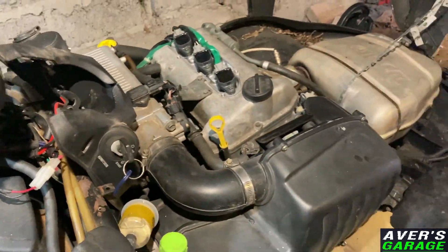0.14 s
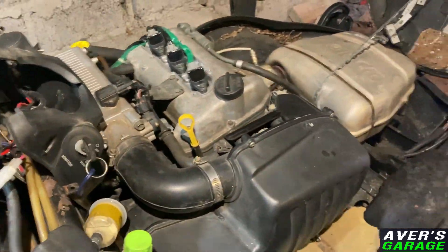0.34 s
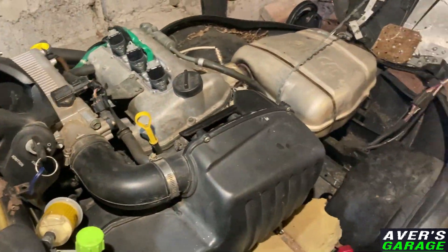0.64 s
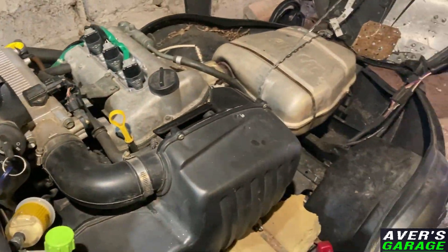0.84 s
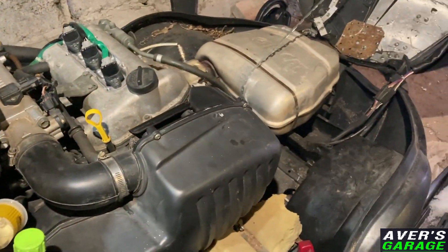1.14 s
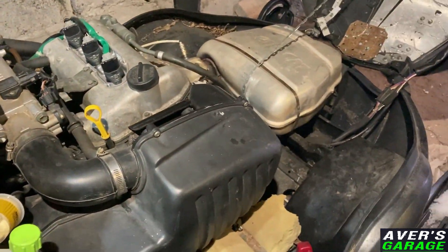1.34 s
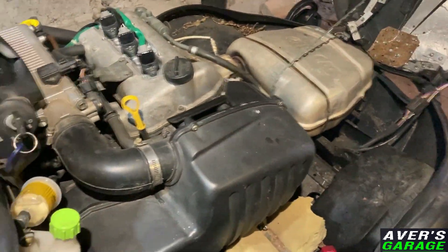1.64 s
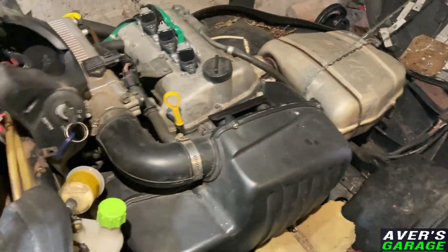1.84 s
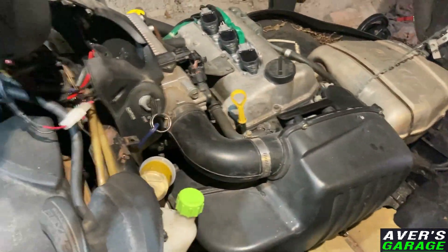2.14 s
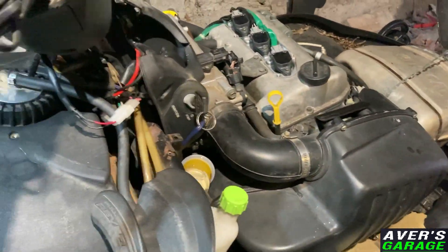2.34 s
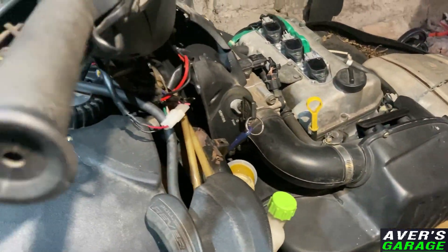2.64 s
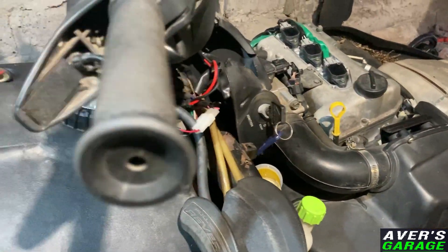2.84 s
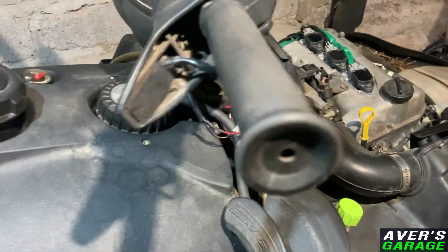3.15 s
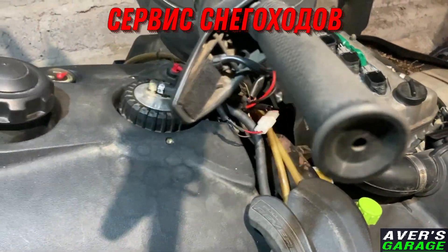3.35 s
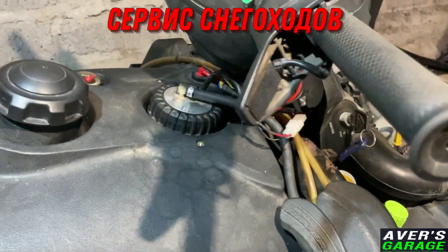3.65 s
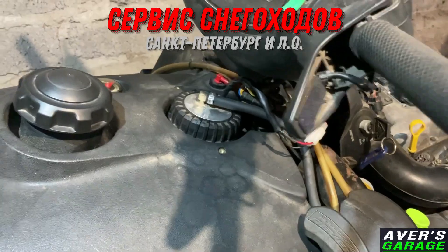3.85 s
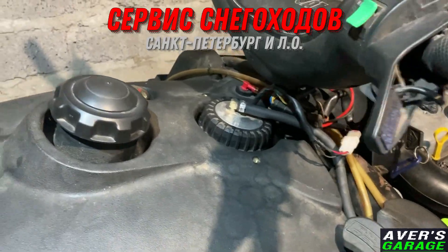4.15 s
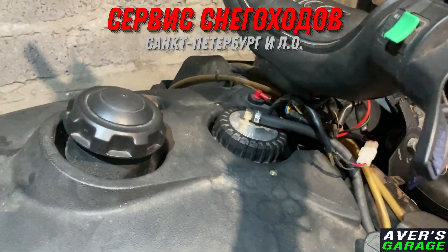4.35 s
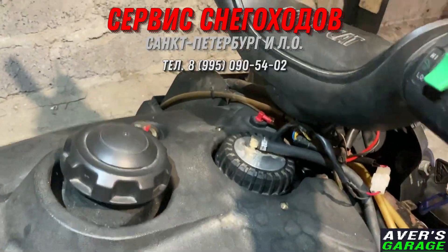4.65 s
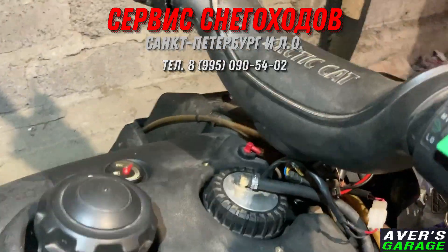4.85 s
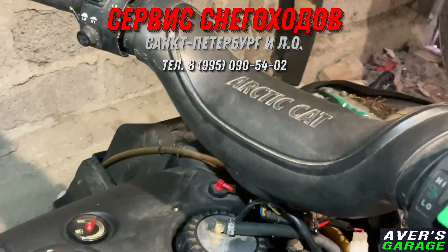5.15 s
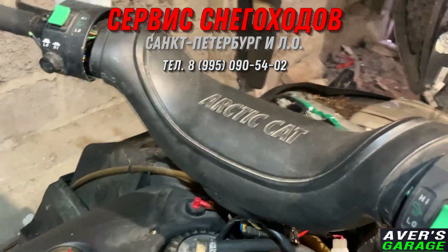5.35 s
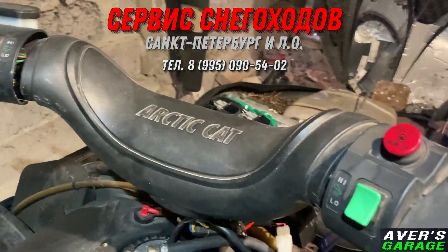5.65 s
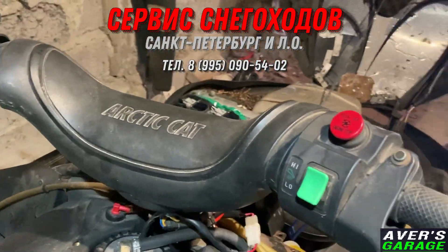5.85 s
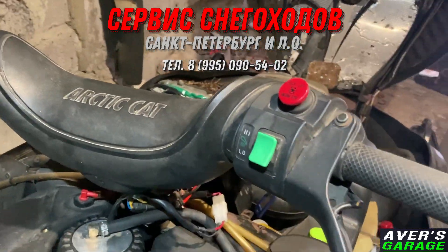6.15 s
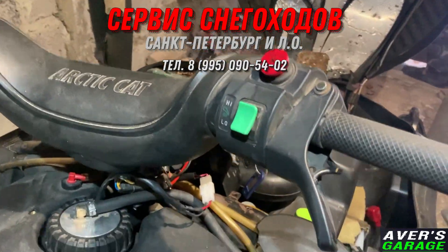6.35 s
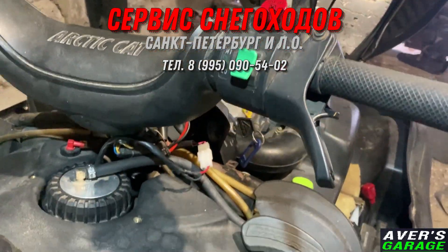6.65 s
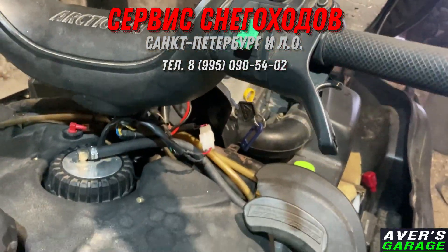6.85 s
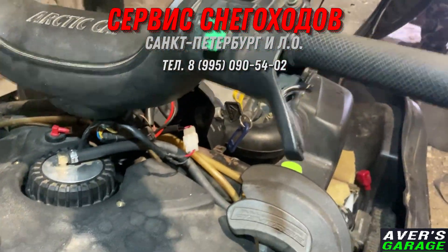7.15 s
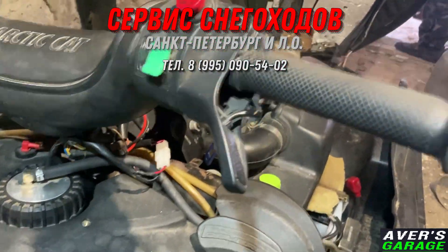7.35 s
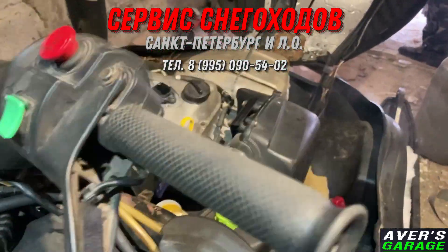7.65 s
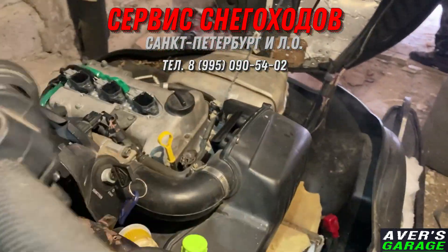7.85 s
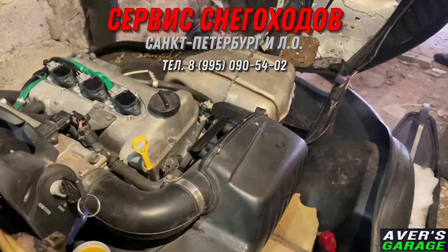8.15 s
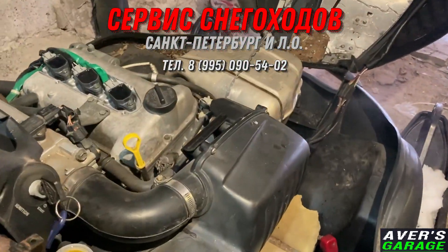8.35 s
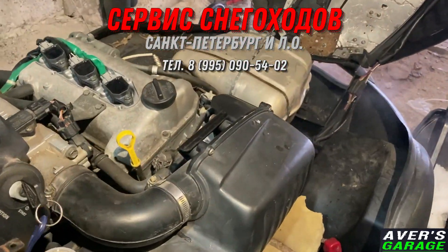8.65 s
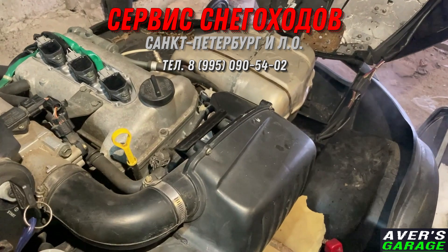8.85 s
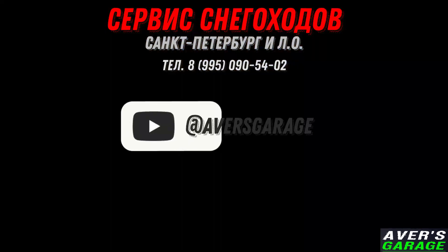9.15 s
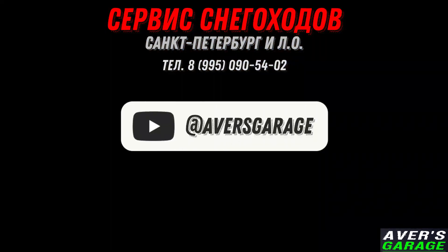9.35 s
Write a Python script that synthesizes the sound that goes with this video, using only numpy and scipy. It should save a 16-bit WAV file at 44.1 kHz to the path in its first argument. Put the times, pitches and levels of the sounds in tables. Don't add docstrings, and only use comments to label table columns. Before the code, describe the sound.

Close stereo sound of an idling four-stroke engine: a droning exhaust hum, dull low rumble, hollow metallic rattle, bright tapping valve gear and uneven loose clacks. The tone shifts as the listener moves around it, gaining rumble and fuller block ringing past halfway. The pace gently drops. A few dull footsteps and gritty scuffs come in the second half, and everything cuts to silence just before the end.

```python
import sys
import numpy as np
from scipy import signal
from scipy.fft import rfft, irfft, next_fast_len
from scipy.io import wavfile
from scipy.ndimage import uniform_filter1d, minimum_filter1d

SR = 44100
rng = np.random.default_rng(int(sys.argv[2]) if len(sys.argv) > 2 else 0)


def unload_audio(sound):
    columns = np.transpose(np.atleast_2d(sound))
    steps = np.round(np.clip(columns, -1, 1) * 32767)
    wavfile.write(sys.argv[1], SR, steps.astype(np.int16))


def rack_gain(trim_db):
    fader = np.asarray(trim_db, float)
    return 10 ** (fader / 20)


N = 419391
COARSE = 16


def evened(x):
    return x / np.sqrt(np.mean(x ** 2) + 1e-20)


def curves(rows):
    s, *columns = np.transpose(rows)
    return [np.interp(np.arange(N) / SR, s, c) for c in columns]


def at_place(way, values):
    return np.interp(way, range(4), values)


def coloured(x, points):
    size = next_fast_len(N)
    hz = np.fft.rfftfreq(size, 1 / SR)
    f, db = np.transpose(points)
    gain = rack_gain(np.interp(np.log(hz + 1), np.log(f), db, -120, -120))
    return irfft(rfft(x, size) * gain, size)[..., :N]


def resonate(x, hz, width):
    return signal.lfilter(*signal.iirpeak(hz, hz / width, SR), x)


def drift(rate_hz, count):
    t = np.arange(count) * COARSE / SR
    rates = np.geomspace(rate_hz / 8, rate_hz, num=7)
    return evened(sum(np.sin(2 * np.pi * (f * t + rng.random())) for f in rates))


def wander(rate_hz):
    return np.repeat(drift(rate_hz, N // COARSE + 1), COARSE)[:N]


def stereo(x, other, same, pan_db):
    same = np.clip(same, 0, 1)
    right = same * x + np.sqrt(1 - same ** 2) * other
    return np.array([x * rack_gain(pan_db / 2), right * rack_gain(-pan_db / 2)])


def exhaust(firings, way):
    # firing multiple, level in dB at each of the four places.
    main_orders = [(2, -46.5, -32.5, -28, -31.5), (3, -29, -25.5, -27.5, -30.5),
                   (4, -15.5, -17.5, -15, -14), (5, -28.5, -26.5, -41, -20.5),
                   (6, -43, -26.5, -21.5, -26.5)]
    # firing multiple, time in seconds of the lowest point,
    # seconds to leave it, change of level in dB at the lowest point.
    order_dips = [
        (3, 3.03, 1.5, -14.5),
        (5, 11, 0.59, -27.5),
        (6, 5.6, 0.75, -8),
    ]
    # multiple, level in dB at each of the four places.
    faint_orders = [(1, -44, -45.5, -71.0, -63), (7, -39, -39.5, -36.5, -28.5), (8, -50, -40, -42, -41.5),
                    (9, -58, -39.5, -38, -41.5), (10, -41.5, -38, -38, -38), (11, -49, -36.5, -31.5, -38),
                    (12, -47, -39, -44, -37), (13, -60, -60.5, -46.5, -34.5), (14, -47.5, -51, -42.5, -43),
                    (15, -58, -48.5, -41.5, -54), (16, -71.5, -68, -48, -51), (17, -62, -48.5, -60, -53.5),
                    (18, -44.5, -42.5, -40, -58), (19, -46, -57.0, -51, -57.5),
                    (20, -40.5, -49.5, -73.5, -51.5), (21, -70, -53, -71, -55),
                    (22, -48.5, -47.5, -74.5, -41.5), (23, -75, -39.5, -67, -55.5)]
    # multiple of the whole cycle, dB at each of the four places.
    uneven_lines = [(4, -50, -44.5, -48, -56), (5, -78, -52.5, -49, -51), (7, -72.5, -45, -47, -48.0),
                    (8, -66, -58, -62, -76.5), (10, -38, -34.5, -53, -55.5), (11, -38, -40, -61.5, -51.5),
                    (13, -43.5, -30, -38.5, -35), (14, -62.5, -39.5, -43, -41.5),
                    (16, -43.5, -40, -41.5, -53), (17, -47, -37, -33, -49), (19, -37, -45, -33, -37.5),
                    (20, -40.5, -36, -43.5, -31.5), (22, -57.5, -61, -42.5, -41), (23, -60, -45, -59, -64),
                    (28, -48, -57, -75, -60.5), (31, -40.5, -39.5, -56.5, -50.5),
                    (32, -60.5, -44.5, -65, -60), (34, -44.5, -39, -38, -47.5),
                    (35, -53, -49, -66.5, -48.5), (37, -79, -60, -57.5, -40), (38, -60, -50.5, -67, -49),
                    (40, -65.5, -53, -63.5, -43)]
    # time in seconds, change in dB.
    weak_firings = [(.299, -4), (.365, 0), (.891, -2.5), (1.156, -1.5), (2.1, -1.5), (2.371, -0.5),
                    (2.575, -2), (2.641, -0.5)]
    hum_pan = [-1.8, -3.0, -1.3, 0.5]
    port_turns, port_multiple = 0.2, 57
    sides = np.array([[0.5], [-0.5]])

    firings, way = firings[::COARSE], way[::COARSE]
    t = np.arange(len(way)) * COARSE / SR
    fifth_turns = 0.25 + 0.45 * (t > 6.95)
    hum = np.zeros((2, len(t)))
    for k, *db in main_orders:
        k = round(k)
        level = rack_gain(at_place(way, db) + 0.5 * drift(12.0, len(t)))
        for order, s, span, dip_db in order_dips:
            if round(order) == k:
                level = level * np.minimum(np.hypot((t - s) / span, rack_gain(dip_db)), 1)
        hum += level * np.cos(2 * np.pi * (k * firings - 0.4 + fifth_turns * (k == 5)))

    cycle_lines = [(3 * round(k), db) for k, *db in faint_orders]
    cycle_lines += [(round(k), db) for k, *db in uneven_lines]
    for k, db in cycle_lines:
        if k % 3:
            turns = k * (firings - 1.45) / 3
        else:
            turns = k * firings / 3 - 0.4
        apart = port_turns * (k / port_multiple) ** 2 * sides
        level = rack_gain(at_place(way, db) + 1.7 * drift(3.0, len(t)))
        jitter = 0.00008 * k * k / 2 * drift(5.0, len(t))
        hum += level * np.cos(2 * np.pi * (turns + apart + jitter))

    weak_db = sum(db * np.exp(-((t - s) / 0.018) ** 2) for s, db in weak_firings)
    pan_db = at_place(way, hum_pan) * sides
    return np.sqrt(2) * signal.resample_poly(hum * rack_gain(weak_db + pan_db), COARSE, 1, axis=1)[:, :N]


def blows(firings, loose_db):
    # place in firings, knock in dB, tick in dB, loose part in dB.
    cycle_blows = [
        (0.504, 6.5, 11.5, -0.5),
        (0.712, 5.5, -31, -8.5),
        (0.922, -8, -33.5, -21.5),
        (1.47, 2, 17, -7.5),
        (1.71, -1, -19, -10),
        (2.46, -13, 8.5, -6),
        (2.7, 6.5, 5.5, -13),
    ]
    spread_db, luck_limit = 2.6, 1.5
    slap_spread = 0.5
    knock, slack, tick = np.zeros((3, N))
    for place, knock_db, tick_db, slack_db in cycle_blows:
        at = np.flatnonzero(np.diff(np.floor((firings - place) / 3)))
        luck = np.clip(rng.standard_normal((4, len(at))), -luck_limit, luck_limit)
        at = np.clip(at + (2.0 * luck[2]).astype(int), 0, N - 1)
        knock[at] += rack_gain(knock_db + spread_db * luck[0])
        slack[at] += rack_gain(slack_db + loose_db[at] + slap_spread * spread_db * luck[3])
        tick[at] += rack_gain(tick_db + spread_db * (0.5 * luck[0] + 1.46 * luck[1]))
    return knock, slack, tick


def hard_slaps(knock, slack, loose_db):
    # time in seconds, level in dB, brightness in dB.
    first = [
        (.009, -14, -30),
        (0.03, -13, -22.5),
        (.097, -15.5, -32.5),
        (0.735, -19.5, -17),
        (.758, -16.5, -14.5),
    ]
    # time in seconds, level in dB, brightness in dB.
    early = [(0.076, -20, -23.5), (0.1411, -11, -21), (0.2074, -17.5, -15), (0.2755, -17, -5.5),
             (0.3628, -12, -34), (0.407, -13.5, -18.5), (0.473, -16.5, -14.5), (0.602, -14.5, -11),
             (0.668, -16, -13), (0.8013, -13, -9.5), (0.9354, -16.5, -10.5), (1.0006, -19.5, -16.5),
             (1.068, -13.5, -12.5), (1.1343, -16.5, -21.5), (1.2012, -24.5, -3.5), (1.267, -18.5, -9),
             (1.337, -18, -13), (1.4027, -22, -6.5), (1.471, -16, -13), (1.5372, -19.5, -6.5),
             (1.605, -24, -12.5), (1.6707, -24.5, -1), (1.7384, -20.5, -14), (1.8066, -20, -12),
             (1.9414, -18.5, -15), (2.0762, -20.5, -18), (2.143, -16, -15), (2.2114, -18.5, -21.5),
             (2.2794, -15, -23), (2.3468, -20, -9), (2.4828, -17.5, -10.5), (2.6842, -15, -18),
             (2.754, -21, -8.5), (2.8217, -16, -15.5), (2.9572, -16, -28), (3.0228, -16, -22.5),
             (3.0927, -14, -24.5), (3.1624, -14, -22.5), (3.228, -15, -16), (3.2962, -14.5, -26),
             (3.3625, -16.5, -14), (3.4356, -16, -22.5), (3.4993, -20, -19), (3.5716, -12, -22),
             (3.6346, -14, -15), (3.708, -23, -21.5), (3.7737, -16, -19), (3.8452, -15, -21.5),
             (3.912, -14, -15.5), (4.12, -18.5, -18), (4.1837, -14.5, -22.5), (4.2535, -12.5, -22),
             (4.3224, -12, -18.5), (4.463, -13.5, -24), (4.5302, -24.5, -18), (4.5988, -14.5, -21),
             (4.67, -19, -20.5), (4.7391, -17, -19.5),
             (5.2277, -14, -19), (5.2967, -19, -12.5), (5.4353, -15.5, -22.5), (5.5056, -15.5, -15.5),
            (5.578, -14, -17), (5.6448, -18, -19), (5.7146, -30, -3.5), (5.788, -13.5, -22.5),
            (5.857, -17.5, -12.5), (5.9306, -17.5, -15), (5.9998, -15, -14.5), (6.075, -16.5, -23.5),
            (6.1454, -11.5, -16), (6.1667, -15, -22.5), (6.218, -17, -19.5), (6.2898, -17, -15),
            (6.3597, -15.5, -13), (6.4102, -19, -17), (6.4323, -18, -13.5), (6.508, -11, -22.5),
            (6.5548, -21, -16), (6.579, -15, -18), (6.654, -16.5, -15), (6.7265, -26.5, -17.5),
            (6.7994, -13.5, -18.5), (6.8742, -13, -26), (6.9451, -14.5, -17.5), (7.0205, -16, -27.5),
            (7.094, -16.5, -15.5), (7.118, -17, -18), (7.169, -16.5, -18), (7.2446, -15.5, -17),
            (7.2686, -23, -8), (7.3188, -14, -20.5), (7.3924, -20, -14.5), (7.4688, -15, -15.5),
            (7.5435, -17, -29), (7.6168, -18.5, -17.5), (7.6937, -14.5, -20), (7.7686, -20, -15.5),
            (7.8436, -17.5, -23.5), (7.921, -15.5, -24), (7.9968, -16, -23), (8.0235, -22.5, -22),
            (8.0747, -17.5, -23), (8.1462, -17, -16.5), (8.3008, -20, -11.5), (8.3766, -22, -16),
            (8.4556, -21, -13.5), (8.533, -24, -13), (8.6121, -19.5, -11.5), (8.637, -22.5, -15.5),
            (8.6912, -24, -5.5), (8.7684, -19.5, -10), (8.846, -19, -10.5), (8.9232, -23.5, -10)]
    lift_db, bright_lift_db, block_knock_db = 21.5, 15.5, 4.5
    lead_s = 0.00099
    s, db, bright_db = np.transpose(first + early)
    at = ((s - lead_s) * SR).astype(int)
    db = db + lift_db + loose_db[at]
    hard = np.zeros((3, N))
    hard[:, at] = rack_gain(np.array([db, db + bright_db + bright_lift_db, block_knock_db + 0 * db]))
    free = minimum_filter1d(1. * (hard[0] == 0), size=441)
    return knock * free + hard[2], slack * free + hard[:2]


def burst(clicks, rise_s, quick_s, slow_s, slow_db, steady_db):
    t = np.arange(4000) / SR
    decay = np.exp(-t / quick_s) + rack_gain(slow_db) * np.exp(-t / slow_s)
    return signal.oaconvolve(clicks, (1 - np.exp(-t / rise_s)) * decay)[:N] + rack_gain(steady_db)


def rumble(knock, way):
    # frequency in Hz, level in dB per Hz.
    rumble_colour = [(18, -57.5), (30, -18.5), (113, -19.5), (173, -8), (297, -20.5), (362, -21),
                     (461, -21.5), (596, -52.5), (900, -23), (1170, -54.5), (1980, -120)]
    place_db = [-41, -36, -29, -29.5]
    level = rack_gain(at_place(way, place_db) + 3 * wander(1.6))
    puffs = burst(knock, 0.0092, 0.0029, 0.015, -30.0, 2.2) * rng.standard_normal((2, N))
    return level * stereo(*evened(coloured(puffs, rumble_colour)), 0.9, -2.6)


def block(knock, way):
    # frequency in Hz, level in dB per Hz.
    rattle_colour = [(290, -27), (500, -9), (563, 2.5), (690, -26.5), (776, -10), (1040, -5), (1830, -10.5),
                     (2320, -7.5), (6500, -14), (8450, -23), (14300, -120)]
    # frequency in Hz, width in Hz, level in dB at each of the four places.
    ring_modes = [(473, 45, 2.5, 6.5, 8, -1.5), (586, 52, -11, 7, 15.5, 2.5), (761, 50, 2, 4.5, 9.5, 4.5),
                  (1034, 51, -13, -2.5, 6, 2), (1190, 160, 1, 6, 9.5, -2.5),
                  (1252, 76, -7.5, -24.5, -13.5, -6.5), (1453, 51, -27.5, 4.5, 0.5, -11),
                  (1534, 26, -3.5, -7.5, -0.5, -1), (1650, 130, -8.5, -4.5, 0, -11),
                  (1906, 73, -5, -0.5, 4.5, -7.5), (2170, 190, -7, -5, 3.5, -2),
                  (2436, 49, -18.5, -33.5, 6, -2.5), (2600, 18, -10.5, -25, -27.5, -4.5),
                  (2600, 250, -19.5, -48, -17, -3.5), (3210, 12, -18, -27, -1, -24),
                  (3720, 21, -11, -12, -26, -28.5), (4010, 210, -7, -14, -7, -3),
                  (4740, 32, -12, -8.5, -3, -3)]
    # time in seconds, change in dB.
    ring_shading = [(0, -1.5), (1.2, 4.5), (2.8, 0), (3.7, -6.5), (4.3, 3.5), (5, 3.5), (6.8, 0), (7.7, -0.5),
                    (8.4, -2), (9, 6)]
    place_db = [-30, -29, -32.5, -29]
    strike_spread_db, ring_share = 3.0, 1.8
    ring_turns = 0.22
    noise = rng.standard_normal((3, N))
    rattle = burst(knock, 0.00025, 0.0031, 0.017, -3.0, -0.5) * noise
    at, rings = np.flatnonzero(knock), np.zeros((2, N))
    for k, (hz, width, *db) in enumerate(ring_modes):
        strike = np.zeros(N)
        strike[at] = rack_gain(strike_spread_db * rng.standard_normal(len(at)))
        level_db = at_place(way, db)
        if k == 2:
            level_db = level_db + curves(ring_shading)[0]
        ring = resonate(13.5 * strike * knock + rattle[2], hz, width) / np.sqrt(width)
        ring = rack_gain(level_db) * ring
        rings += [ring, np.roll(ring, round(ring_turns * SR / hz))]
    body = evened(evened(coloured(rattle[:2], rattle_colour)) + ring_share * evened(rings))
    return rack_gain(at_place(way, place_db)) * stereo(*body, 0, 0.21)


def loose_part(slack, way):
    # frequency in Hz, width in Hz, level in dB at each of the four places.
    slap_modes = [(1150, 204, -7.5, -3, 6, 2.5), (1422, 144, -8, -3.5, 6.5, -4.5),
                  (1725, 213, 0.5, -0.5, 3, -1.5), (2174, 200, -2.5, -8, 3, -5.5),
                  (3000, 1470, 0, -9.5, 5, -4.5)]
    click_gain = 7.0
    noise = stereo(*rng.standard_normal((2, N)), 0.13, 0.5)
    clacks = []
    for train in slack:
        clack = burst(train, 0.00015, 0.004, 0.018, -2.0, -61.5) * noise
        clacks.append(click_gain * train + clack)
    total = np.zeros((2, N))
    for k, (hz, width, *db) in enumerate(slap_modes):
        top = k == len(slap_modes) - 1
        ring = resonate(resonate(clacks[int(top)], hz, width), hz, 1.8 * width)
        total += rack_gain(at_place(way, db)) * ring / np.sqrt(width)
    return rack_gain(-32) * evened(total)


def valve_gear(tick, way):
    # frequency in Hz, level in dB per Hz.
    tick_colour = [(4200, -24), (5300, 2), (6300, 1), (7300, 7.5), (8300, 8), (9200, 16.5), (11000, 6),
                   (13500, 1.5), (15700, 4), (15950, -64.5)]
    place_db = [-32, -34, -36, -30]
    ticks = burst(tick, 0.00015, 0.00156, 0.012, 0, -0.5) * rng.standard_normal(N)
    return rack_gain(at_place(way, place_db)) * evened(coloured(ticks, tick_colour))


def steps():
    # start in seconds, length in seconds, thump in dB, scuff in dB, dullness from 0 to 1.
    footfalls = [
        (5.054, 0.13, -34, -14.5, 0.71),
        (5.102, 0.62, -32, -25.5, 0.94),
        (5.284, 0.096, -25, -23, 0.85),
        (5.435, 0.12, -22.5, -35.5, 0.24),
        (5.709, 0.067, -52, -18.5, 0.6),
        (5.798, 0.14, -38.5, -28.5, 0.3),
        (6.745, 0.2, -18.5, -17, 0.8),
        (6.854, 0.25, -19, -24.5, 0.85),
        (6.946, 0.22, -36, -28.5, 0.97),
    ]
    # frequency in Hz, level in dB per Hz.
    bright_grit = [(60, -30.5), (200, -7), (585, -34), (1480, -16), (3480, 0.5), (5600, -6.5), (9800, -10),
                   (15800, -14)]
    # frequency in Hz, level in dB per Hz.
    dull_grit = [(45, -1), (120, -2), (250, -3), (440, -5), (700, -12), (1480, -17), (4000, -32),
                 (6000, -32), (15800, -54)]
    t, thump = np.arange(N) / SR, np.zeros(N)
    bright_scrape, dull_scrape = np.zeros((2, N))
    for s, length, thump_db, scuff_db, dull in footfalls:
        u, dull = np.maximum(t - s, 0) / length, np.clip(dull, 0, 1)
        thump += rack_gain(thump_db) * 5.8 * u * np.exp(-2.5 * u) * np.sin(2 * np.pi * 59.0 * (t - s))
        scrape = rack_gain(scuff_db) * (1 - np.exp(-16.0 * u)) * np.exp(-1.8 * u ** 1.53)
        bright_scrape += (1 - dull) * scrape
        dull_scrape += dull * scrape
    grain_db = 1.5 * uniform_filter1d(rng.standard_normal(N), size=100) * 20
    grit = rng.standard_normal((2, N)) * rack_gain(grain_db)
    sole = bright_scrape * evened(coloured(grit, bright_grit))
    sole = sole + dull_scrape * evened(coloured(grit, dull_grit))
    return thump + stereo(*sole, 0.54, 0.5)


def scene():
    # time in seconds, place from 0 to 3 round the engine.
    walk = [
        (0, 0),
        (1.5, 0.51),
        (3.2, 0.5),
        (4.8, 1.08),
        (6.0, 2),
        (6.8, 2),
        (7.8, 2.5),
        (8.4, 3),
    ]
    # time in seconds, firings per second.
    speed = [(0.0, 45.459), (0.6, 45.624), (1.27, 44.634), (1.73, 44.683), (2.31, 44.237), (2.83, 44.284),
             (3.89, 43.909), (4.19, 43.563), (4.41, 43.155), (5.43, 43.068), (6.06, 41.883), (6.98, 40.717),
             (7.18, 40.309), (8.16, 39.166), (8.42, 38.507), (8.97, 38.532)]
    # time in seconds, level in dB.
    looseness = [(0, 5.5), (.3, 1), (1.6, 10), (2.2, 9.5), (2.9, 10.5), (3.7, 11), (4.4, 8.5), (5.3, 7),
                 (5.9, 3.5), (6.3, 6), (6.8, 3.5), (7.9, 9), (8.4, 9.5), (8.9, 11.5)]
    way, loose_db = curves(walk)[0], curves(looseness)[0]
    firings = np.cumsum(curves(speed)[0]) / SR
    knock, slack, tick = blows(firings, loose_db)
    knock, slack = hard_slaps(knock, slack, loose_db)
    engine = exhaust(firings, way) + rumble(knock, way) + block(knock, way)
    return engine + loose_part(slack, way) + valve_gear(tick, way) + steps()


def roll_off(x):
    return signal.sosfilt(signal.butter(12, 17130, fs=SR, output="sos"), x)


def record(dry):
    port_lag_s, stop_s = 1 / 4600, 8.9655
    size = next_fast_len(N)
    hz, z = np.fft.rfftfreq(size, 1 / SR), rfft(dry, size)
    share = np.clip((hz - 4600.0) / 740.0, 0, 1)
    late_right = z[1] * np.exp(-2j * np.pi * hz * port_lag_s)
    z[0] = np.sqrt(1 - share ** 2) * z[0] - share * late_right
    z /= (1 + (36.0 / (hz + 1)) ** 6) * (1 + (hz / 15900) ** 150)
    mix = irfft(z, size)[:, :N] * (np.arange(N) < stop_s * SR)
    return roll_off(mix)


dry = scene()
out = record(dry)
unload_audio(out)
```